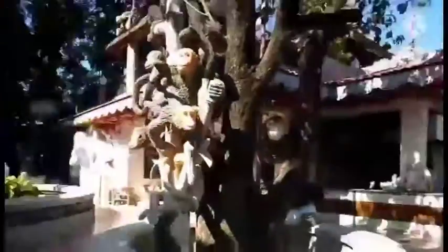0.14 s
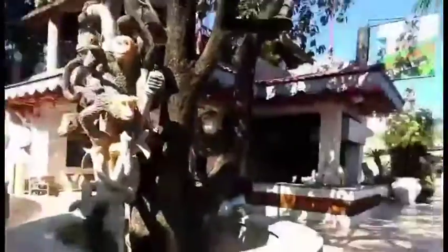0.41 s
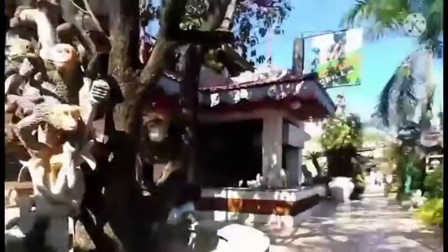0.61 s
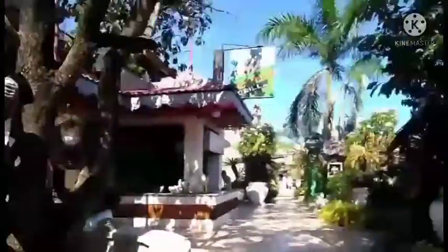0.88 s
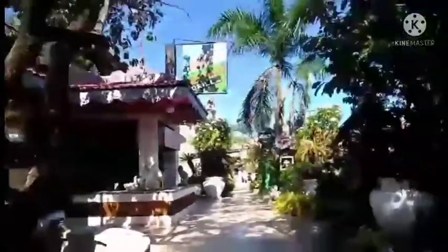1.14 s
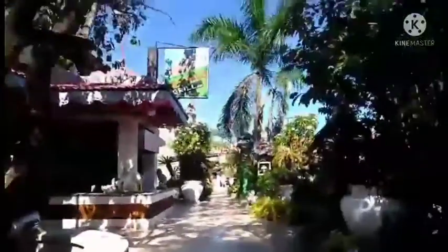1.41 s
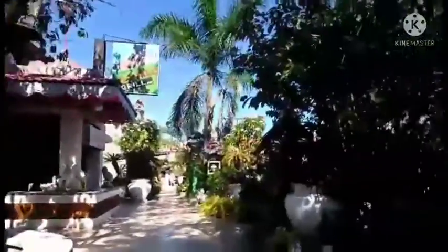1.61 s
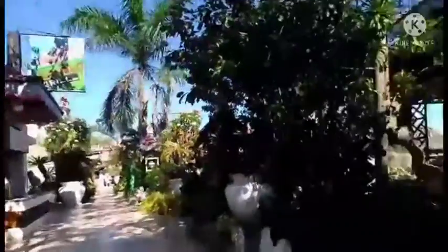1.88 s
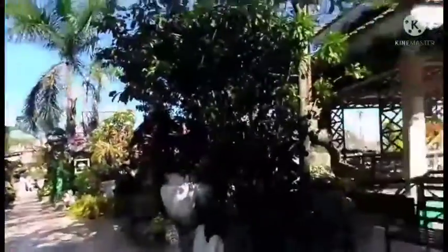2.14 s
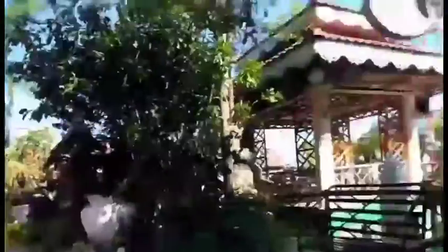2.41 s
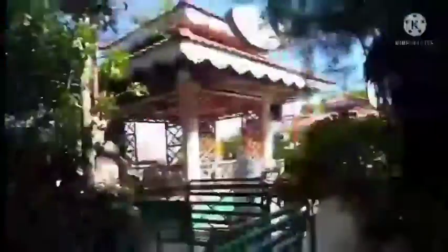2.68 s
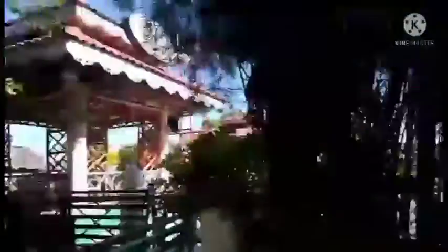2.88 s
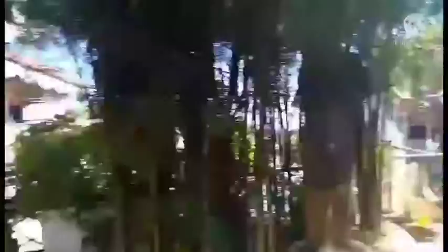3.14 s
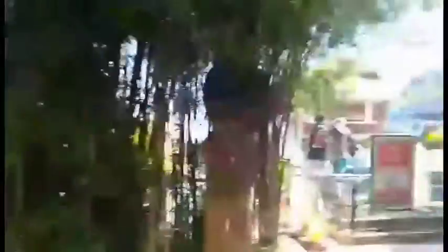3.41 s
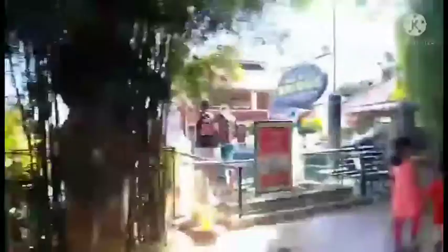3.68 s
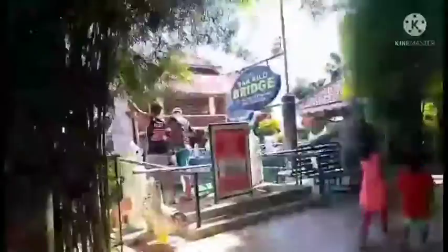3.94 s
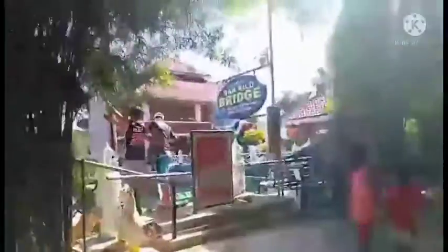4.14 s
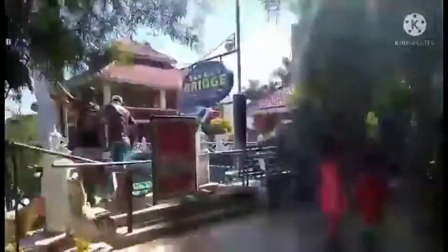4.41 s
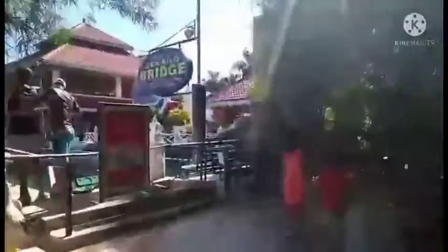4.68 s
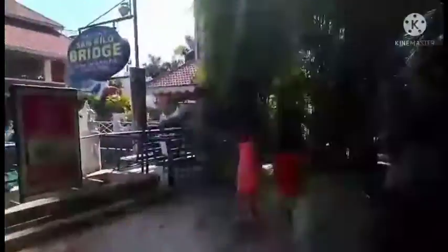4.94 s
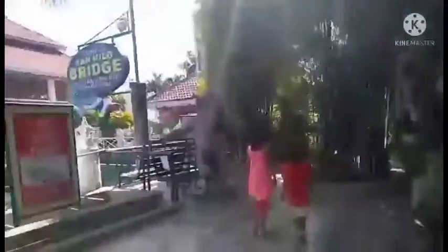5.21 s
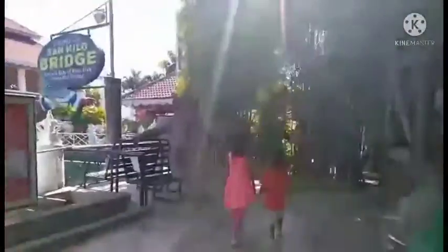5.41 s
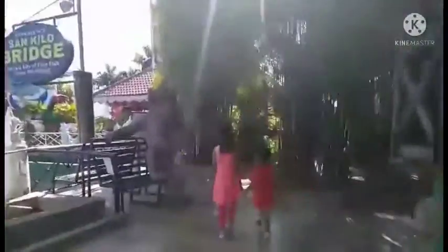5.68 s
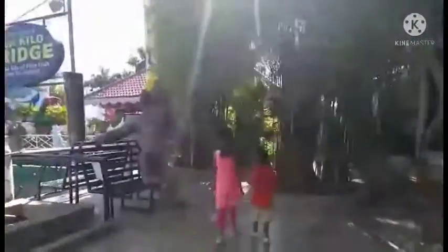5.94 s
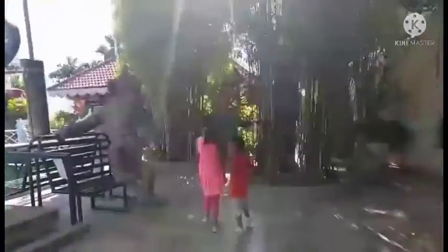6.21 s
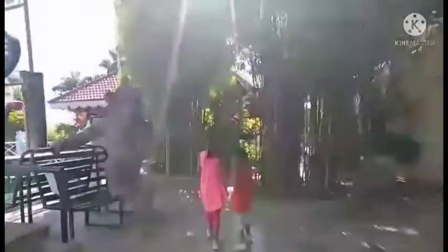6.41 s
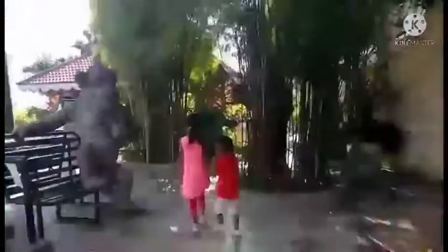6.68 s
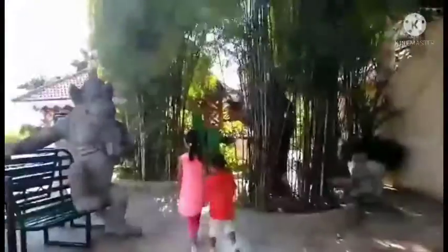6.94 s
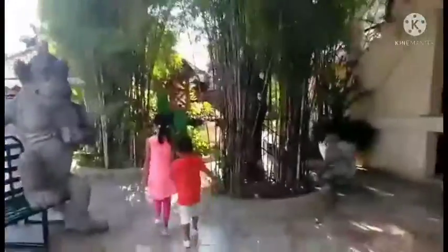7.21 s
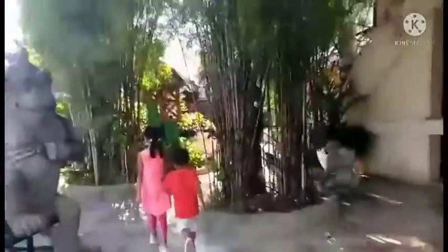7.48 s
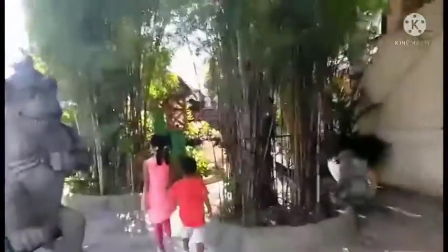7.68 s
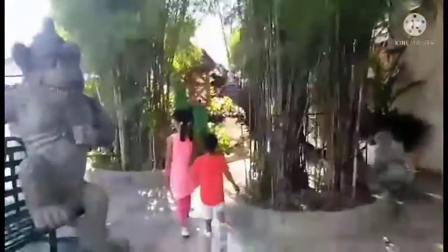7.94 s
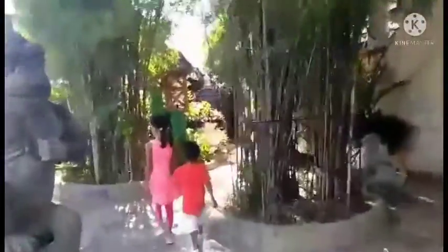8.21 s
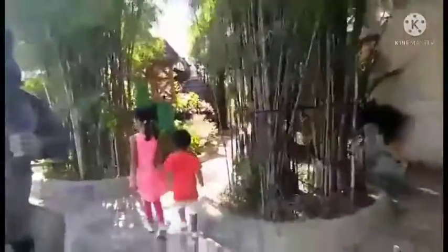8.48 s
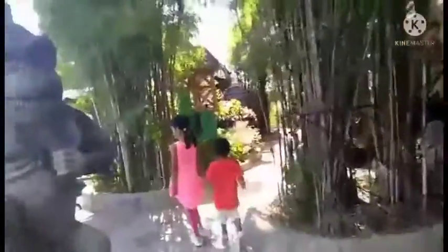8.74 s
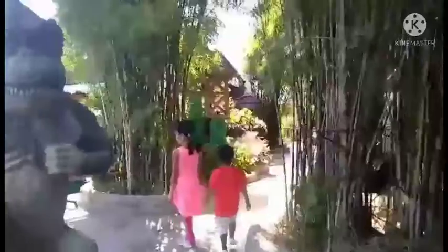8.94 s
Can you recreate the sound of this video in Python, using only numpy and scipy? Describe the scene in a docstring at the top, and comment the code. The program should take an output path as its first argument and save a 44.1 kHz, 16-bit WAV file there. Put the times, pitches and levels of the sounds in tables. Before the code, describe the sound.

A quiet outdoor garden path, heard by two close microphones, the right one brighter. Broad soft rustling of leaves and cloth wavers throughout, slightly fuller after 4 s, above faint distant traffic rumble and low engine hum, with extra engine tones in the later half. Small grit clicks come at 0.4-0.5 s and a bright snap at 0.9 s. From 1.1 to 1.8 s a light shoe scuffs with a rapid patter of soft taps; only faint taps follow until 3.2 s. Grit crackles, then a hard step lands with a rasp at 3.8 s, trailing taps to 4.3 s. A firm knock comes at 4.66 s, and the sharpest gritty snap at 5.03 s breaks into stuttering scrapes. Steps and drags continue from 5.86 to 7 s, then sparse taps at 7.5 and 8.1 s and a crisp scuff at 8.6 s. Rustle remains to about 9 s.

```python
"""Leaves and cloth rustle in a quiet garden over far traffic that rumbles and hums: shaped noise, low tones.
Then grit snaps and light shoes tap on a paved path: clicks and dying contact noise ring short resonances.
From about one second on, soles also drag and scuff: streams of grit clicks ring the sole, hiss and judder.
Two close microphones hear it all, the right one brighter."""
import sys
import numpy as np
from scipy import signal
from scipy.fft import rfft, irfft, next_fast_len
from scipy.io import wavfile

SR = 44100
rng = np.random.default_rng(int(sys.argv[2]) if len(sys.argv) > 2 else 0)


def master_out(mix):
    """Clip the mix to full scale and print it as 16-bit PCM to the path in sys.argv[1]."""
    frames = np.transpose(np.atleast_2d(mix))
    ceiling = np.clip(frames, -1, 1)
    pcm = np.round(ceiling * 32767).astype(np.int16)
    wavfile.write(sys.argv[1], SR, pcm)


def gain_from_decibels(decibels):
    """Convert decibel values to linear amplitude factors."""
    exponent = np.asarray(decibels, float) / 20
    return 10 ** exponent


N = 400869


def curve(rows):
    """Columns of a table, with time in seconds first, read at every sample."""
    s, *columns = np.transpose(rows)
    return [np.interp(np.arange(N) / SR, s, column) for column in columns]


def at_hz(points, hz):
    """A spectrum read on a log-frequency axis."""
    point_hz, values = np.transpose(points)
    return np.interp(np.log(hz), np.log(point_hz), values)


def rms_one(x):
    """Scale to unit power."""
    return x / np.sqrt(np.mean(x ** 2) + 1e-20)


def drift(rate_hz):
    """Slow random wander of unit power: noise through two equal low-pass poles at rate_hz."""
    step = 40   # samples between the points of the wander
    warm_up = 2000
    r = np.exp(-2 * np.pi * rate_hz * step / SR)
    noise = rng.standard_normal(N // step + warm_up + 2)
    slow = signal.lfilter([1], [1, -2 * r, r * r], noise)[warm_up:]
    return np.interp(np.arange(N) / step, np.arange(len(slow)), rms_one(slow))


def band_pass(x, low_hz, high_hz):
    """Butterworth band between two corners."""
    return signal.sosfilt(signal.butter(2, [low_hz, high_hz], "band", fs=SR, output="sos"), x)


def resonance(x, hz, width_hz):
    """Two-pole band-pass with gain 1 on top."""
    r = np.exp(-np.pi * width_hz / SR)
    feedback = [1, -2 * r * np.cos(2 * np.pi * hz / SR), r * r]
    return signal.lfilter([(1 - r * r) / 2, 0, (r * r - 1) / 2], feedback, x + 1e-18)


def double_resonance(x, hz, width_hz):
    """The same resonance twice in a row, for steeper flanks."""
    return resonance(resonance(x, hz, width_hz), hz, width_hz)


def treble(x):
    """The band of fine grit."""
    return band_pass(x, 4200, 11800)


def grains(per_s, spread_db):
    """Random clicks of uneven size and sign."""
    sizes = gain_from_decibels(spread_db * np.minimum(rng.exponential(1, N), 5)) * rng.choice([-1, 1], N)
    return sizes * (rng.random(N) < per_s / SR)


def banded_noise(spectrum, edges, patchy_db, together_db, side_db=0):
    """Stereo noise in bands, each with its own level, flicker, likeness and lean to one side."""
    # Each row: frequency in Hz, correlation of left and right.
    likeness = [(60, 1), (400, 0.87), (1200, 0.022), (3000, 0.011)]
    # Each row: frequency in Hz, factor on the left-right dB of the whole noise.
    lean = [(500, 0), (1500, 0.77), (4000, 0.73), (8000, 1.5), (13000, 5.5)]
    out, together = 0, drift(4.5)
    white = rng.standard_normal((2, 2, N))   # neighbouring bands take turns with two stereo noises
    for k, (low, high) in enumerate(zip(edges, edges[1:])):
        mid, side = band_pass(white[k % 2], low, high)
        hz = np.sqrt(low * high)
        alike = np.clip(at_hz(likeness, hz), -1, 1)
        lean_db = side_db * at_hz(lean, hz) * np.array([[.5], [-.5]])
        waver_db = patchy_db * drift(24) + together_db * together
        gain = gain_from_decibels(at_hz(spectrum, hz) + waver_db + lean_db)
        out = out + gain * (np.sqrt(1 + alike) * mid + np.sqrt(1 - alike) * side * [[1], [-1]])
    return rms_one(out)


def rustle():
    """Leaves and cloth: broad noise that wavers band by band, and a little as a whole."""
    # How the rustle moves. Each row: time in seconds, level in dB, left-right dB before the lean per band.
    air = [(0.0, -46.5, -5.5), (0.33, -49, -3), (0.95, -48.5, -3.5), (1.3, -46, -4.5), (1.8, -47.5, -6.5),
           (1.96, -50.5, -3.5), (2.2, -45.5, -5), (3.1, -47.5, -5), (4.1, -44, -3.5), (4.9, -44, -5),
           (5.44, -43.5, -3), (6.15, -47, -4.5), (6.4, -43, -2.5), (7.1, -43, -4), (7.62, -44.5, -4.5),
           (8.5, -45.5, -4.5), (9.09, -43, -5)]
    # Colour of leaves and cloth. Each row: frequency in Hz, relative density in dB per Hz.
    rustle_colour = [(240, -30), (400, 0), (625, -3.5), (1440, -4), (2380, -0.5), (3410, -2), (10600, -5.5),
                     (12800, -36.5), (13400, -21), (14000, -69)]
    level_db, side_db = curve(air)
    edges_hz = 400 * 2 ** np.arange(0, 5.3, .5)
    noise = banded_noise(rustle_colour, edges_hz, patchy_db=2.2, together_db=.7, side_db=side_db)
    return gain_from_decibels(level_db) * noise


def rumble():
    """Far traffic: low noise in bands, nearly alike on both sides."""
    # Colour of the traffic. Each row: frequency in Hz, relative density in dB per Hz.
    rumble_colour = [(15, -36), (25, -5), (54, 0), (84, -2), (161, -6.5), (216, -12.5), (281, 0),
                     (339, -14), (600, -42), (780, -45), (1320, -120)]
    edges_hz = [36, 50, 70, 100, 140, 190, 270, 400, 600]
    return gain_from_decibels(-53.5) * banded_noise(rumble_colour, edges_hz, patchy_db=2.0, together_db=-0.3)


def engines():
    """Far engines: low tones with an octave above, wavering slightly in pitch and level."""
    # One list per engine. Each row: time in seconds, pitch in Hz, level in dB, octave relative to it in dB.
    engine_paths = [
        [(0, 87.2, -55, -14), (1.2, 86.36, -76, 10), (2.3, 90.4, -55.5, -26), (2.9, 89.05, -59, -11),
         (5.3, 85.9, -62, -11)],
        [(4.9, 47.8, -89, 8), (6.0, 51.14, -57, -17), (7.2, 54.6, -52, -9.5), (9.09, 56.4, -58.5, 2)],
        [(4.2, 148.8, -79, -23), (5.4, 151.2, -59, -22), (6.2, 145, -63.5, -17), (7.2, 148.7, -63, -26)],
        [(5.0, 150, -91, -30), (6.0, 130, -55.5, -24), (7.0, 130, -58.5, -33)],
    ]
    out, t = 0, np.arange(N) / SR
    for rows in engine_paths:
        hz, level_db, octave_db = curve(rows)
        turns = np.cumsum(hz * (1 + 0.01163 * drift(3.04))) / SR
        phase = 2 * np.pi * turns + np.array([[.12], [-.12]])   # left leads right slightly
        heard = (t >= rows[0][0]) & (t <= rows[-1][0])
        tone = np.sin(phase) + gain_from_decibels(octave_db) * np.sin(2 * phase)
        out = out + heard * np.sqrt(2) * gain_from_decibels(level_db + 2.9 * drift(2.7)) * tone
    return out


def snaps():
    """Grit snaps under a sole: a click and a weaker one just behind it, ringing for a cycle or two."""
    # Single grains that snap. Each row: start in seconds, peak in dB, centre of the ring in Hz.
    snap_rows = [(0.426, -31, 5500), (0.482, -30.5, 2500), (0.902, -15.5, 7300), (0.945, -31, 9000),
                 (1.379, -23, 2110), (3.216, -29, 3520), (3.8, -12, 2280), (5.033, -11, 2820),
                 (5.038, -8, 2930), (5.04, -12, 1600), (5.097, -15, 3100), (5.105, -12.5, 2900),
                 (5.863, -19.5, 2250), (5.865, -23, 1100), (6.251, -15, 1970), (6.625, -15.5, 2800),
                 (8.02, -23.5, 4650), (8.613, -20, 3000), (8.623, -20, 3270)]
    width_share = 0.77   # width of each ring stage as a share of its centre
    out = np.zeros(N + SR)
    chance = rng.random((len(snap_rows), 2))
    for (s, peak_db, hz), (lag, size) in zip(snap_rows, chance):
        clicks = np.zeros(SR // 50)
        clicks[0] = 1
        clicks[round((.0006 + .001 * lag) * SR)] = .6 * size
        sound = double_resonance(clicks, hz, width_share * hz)
        i = round(s * SR)
        out[i:i + len(sound)] += gain_from_decibels(peak_db) * sound / np.abs(sound).max()
    return out[:N]


def taps():
    """A blow and a few ms of dying contact noise excite a ring and the sole's modes, with a bright crack."""
    # Soles and pebbles. Each row: start in seconds, peak of the body in dB, centre of the ring in Hz,
    # crack relative to that peak in dB.
    tap_rows = [(0.48, -35.5, 1100, 5), (0.888, -45, 1110, 18), (0.92, -35.5, 1640, -25),
                (1.215, -37.5, 527, -12), (1.278, -32.5, 1960, -22), (1.322, -27, 2500, -12),
                (1.383, -29.5, 1820, -16), (1.419, -31, 2310, -8), (1.436, -35, 1100, -16),
                (1.461, -34, 2250, -16), (1.496, -32, 2400, -16), (1.509, -33, 2300, -16),
                (1.538, -33, 2300, -16), (1.566, -32, 2350, -16), (1.602, -33, 2450, -16),
                (1.635, -34, 2450, -16), (1.695, -35, 2600, -16), (2.013, -38.5, 1600, -16),
                (2.03, -43, 560, 8), (2.27, -33, 2030, -14), (3.282, -33, 890, -16),
                (3.436, -23.5, 1760, -5), (3.817, -11, 1800, -10), (3.98, -24.5, 1216, -18),
                (4.029, -28.5, 2100, -16), (4.078, -30, 1710, -15), (4.102, -25, 1750, 0.5),
                (4.181, -33.5, 2200, -12), (4.196, -33, 2350, -26), (4.239, -22, 2150, -20),
                (4.253, -29, 2200, -20), (4.333, -31, 2300, -16), (4.639, -34, 1075, -7),
                (4.658, -14, 1080, -2.5), (4.661, -24.5, 580, -30), (4.868, -40, 720, -7),
                (5.863, -21.5, 640, 10), (5.873, -25.5, 587, -38), (6.051, -36, 860, -9),
                (6.254, -20, 1100, -24), (6.3, -24.5, 3220, -2), (6.464, -25.5, 1870, -11),
                (6.501, -34, 1996, -9), (6.531, -23, 1938, -21), (6.565, -23, 1910, -36),
                (6.615, -30, 1890, -15), (6.626, -20, 2100, -5), (6.757, -29, 2270, -18),
                (6.841, -33, 1954, -16), (7.002, -31, 1620, -13), (7.47, -42.5, 580, -11),
                (7.57, -30, 1840, -12), (7.578, -39, 895, 6), (8.12, -34, 1380, -4),
                (8.191, -32, 1100, -10), (8.605, -24, 2700, -11), (8.693, -25, 2380, -7)]
    # Modes of sole on stone. Each row: frequency in Hz, relative level in dB before distance and chance,
    # decay setting in seconds (the mode is 3 / decay Hz wide).
    sole_modes = [(396, 2.5, 0.013), (594, 7.5, 0.045), (717, 6, 0.023), (1017, 15, 0.0046),
                  (1386, 1.5, 0.0068), (1586, 5.5, 0.041), (1938, 15, 0.0042), (2350, 12.5, 0.015),
                  (2640, 5, 0.0096), (3270, 9.5, 0.0031)]
    contact_cycles = 12   # contact noise falls 26 dB in this many cycles of the centre
    blow_share = .4       # first blow against the root energy of the contact noise
    ring_width = 0.16     # width of each ring stage as a share of its centre
    modes_db = 5.5        # the modes together, above the ring
    out = np.zeros(N + SR)
    chance = rng.standard_normal((len(tap_rows), len(sole_modes)))
    t = np.arange(SR // 8) / SR
    for (s, peak_db, centre_hz, crack_db), dice in zip(tap_rows, chance):
        contact = rng.standard_normal(len(t)) * np.exp(-3 * t * centre_hz / contact_cycles)
        contact[0] = blow_share * np.sqrt(np.sum(contact ** 2))
        modes = 0
        for (hz, level_db, decay_s), d in zip(sole_modes, dice):
            # modes far from the centre are struck less
            far_db = max(-13 * np.abs(np.log2(hz / centre_hz)), -16)
            # each mode takes only its part of the blow
            struck = resonance(resonance(contact, hz, hz * .5), hz, hz * 0.56)
            mode = rms_one(resonance(struck, hz, 3.0 / decay_s))
            modes = modes + gain_from_decibels(level_db + far_db + 3 * d) * mode
        ring = double_resonance(t == 0, centre_hz, ring_width * centre_hz)
        body = ring / np.abs(ring).max() + gain_from_decibels(modes_db) * modes / np.abs(modes).max()
        crack = treble(contact)
        sound = body / np.abs(body).max() + gain_from_decibels(crack_db) * crack / np.abs(crack).max()
        i = round(s * SR)
        out[i:i + len(t)] += gain_from_decibels(peak_db) * sound
    return out[:N]


def strokes():
    """Gains of drag and grit over time, and the rasp centre weighted by drag power."""
    # Drags of sole and grit. Each row: start in seconds, length in seconds, drag level in dB before swell
    # and fall, fine grit relative to the drag in dB, centre of the rasp in Hz.
    scuff_rows = [(1.083, 0.15, -48.5, -1, 2730), (1.317, 0.5, -44, -7.5, 2470),
                  (1.359, 0.025, -38.5, -15, 1900), (3.207, 0.056, -36.5, -9.5, 2570),
                  (3.228, 0.31, -45.5, 3.5, 3230), (3.46, 0.07, -44, 2, 1500),
                  (3.514, 0.11, -38.5, 0, 2280), (3.606, 0.34, -43.5, -0.5, 2900),
                  (3.782, 0.096, -24, -13, 1820), (3.884, 0.031, -31, -8, 1700),
                  (3.947, 0.048, -37, -4, 2500), (4.185, 0.029, -41, -3, 2350),
                  (4.269, 0.27, -39.5, -6.5, 2350), (5.024, 0.011, -25, -7, 2250),
                  (5.028, 0.015, -19.5, -2.5, 2500), (5.05, 0.04, -30.5, -1.5, 2500),
                  (5.093, 0.014, -29, -12, 2600), (5.116, 0.026, -31.5, -2, 2180),
                  (5.161, 0.012, -30.5, -1.5, 2350), (5.189, 0.019, -30.5, -2.5, 2220),
                  (5.214, 0.035, -29, -2.5, 2350), (5.285, 0.13, -35.5, 0.5, 2350),
                  (5.375, 0.4, -42, 0.5, 2090), (5.827, 0.018, -39, -12, 1100),
                  (6.249, 0.0082, -25, 1.5, 2340), (6.29, 0.048, -33, -2.5, 4000),
                  (6.366, 0.053, -30, 0, 2170), (6.415, 0.25, -37, -2, 2100),
                  (6.709, 0.19, -40, -7.5, 2100), (6.95, 0.094, -45, -18, 2200),
                  (7.268, 0.14, -60.5, 19.5, 2450), (7.551, 0.015, -48, -17, 1100),
                  (8.598, 0.03, -26, -12, 2580), (8.634, 0.018, -39, 2, 800),
                  (8.703, 0.01, -31, -4.5, 1490)]
    rise_s, rise_share = 0.0039, 0.16     # a drag swells in this time plus this share of its length,
    sag_db, lift_db_per_s = 5.5, 522      # sags over its length and dies when the sole lifts
    t = np.arange(N) / SR
    drag, grit, pitch = np.full((3, N), 1e-12)
    for s, length, drag_db, grit_db, hz in scuff_rows:
        swell = np.clip((t - s) / (rise_s + rise_share * length), 0, 1)
        sag = sag_db * np.clip((t - s) / length, 0, 1)
        lift = lift_db_per_s * np.maximum(t - s - length, 0)
        power = (swell * gain_from_decibels(drag_db - (sag + lift))) ** 2
        drag = drag + power
        grit = grit + power * gain_from_decibels(2 * grit_db)
        pitch = pitch + power * np.log(hz)
    return np.sqrt(drag), np.sqrt(grit), np.exp(pitch / drag)


def scuffs():
    """Grit clicks ring the sole near each drag's centre: light drags crackle in clumps, hard ones
    stick and slip about a hundred times a second. Each side also hears grit of its own."""
    # Drag of rubber on stone. Each row: frequency in Hz, width of each filter stage in Hz, relative level
    # in dB at the rasp centre.
    drag_bands = [(560, 300, 5.5), (1100, 560, -0.5), (1815, 460, -0.5), (2100, 780, -2.5), (2500, 1180, 0),
                  (3000, 1250, 0.5), (4100, 7000, 4)]
    drag_gain, grit_gain, centre_hz = strokes()
    hard = np.clip(drag_gain / gain_from_decibels(-30), 0, 1)
    # sticking and slipping, at a wandering rate in Hz
    phase = np.cumsum(105.9 * gain_from_decibels(2.8 * drift(28.4)) / SR) % 1
    judder = .45 + 1.6 * np.sin(np.pi * phase ** .6) ** 2
    # each clump starts at once and fades with a time constant of 3 ms
    clump_fade = np.exp(-1 / (.003 * SR))
    clumps = .9 + rms_one(signal.lfilter([1], [1, -clump_fade], np.abs(grains(100, 1.5))))
    crackle = rms_one(grains(1000, 2.7) * clumps)
    rubbing = rms_one(grains(7000, 1.0))
    own = rms_one(np.array([grains(3000, 0.39) for side in "LR"]))
    light_clicks = (1 - hard) * (.9 * crackle + .2 * rubbing)
    hard_clicks = hard * judder * rubbing
    clicks = light_clicks + hard_clicks + .6 * own * rms_one(clumps)
    drag, power = 0, 0
    for k, (hz, width_hz, level_db) in enumerate(drag_bands):
        # bands away from the rasp centre are weaker, less so in a hard drag
        far_db = (19 - 7.4 * hard) * np.abs(np.log2(hz / centre_hz))
        share = gain_from_decibels(level_db - far_db)
        band = double_resonance(clicks, hz, width_hz)
        drag = drag + (-1) ** k * share * rms_one(band)
        power = power + share ** 2
    grit = treble(0.33 * crackle + 0.051 * rubbing + own * clumps ** 0.57)
    return drag_gain * drag / np.sqrt(power) + grit_gain * rms_one(grit)


def two_ports(x):
    """Left hears steps duller, right brighter and slightly later; ground, walls and trunks echo."""
    # Difference between the microphones. Each row: frequency in Hz, left-right dB.
    tilt = [(300, 3), (1000, 0.5), (3000, -1), (5000, 1), (8000, -4), (13000, -11)]
    # Dulled echoes of the steps. Each row: delay left in seconds, delay right in seconds, level in dB.
    echo_rows = [(0.01, .014, -11), (0.024, 0.021, -18.5), (0.043, 0.047, -21.5)]
    size = next_fast_len(N + SR)
    hz = np.maximum(np.fft.rfftfreq(size, 1 / SR), 1)
    half = gain_from_decibels(at_hz(tilt, hz) / 2)
    turn = -2j * np.pi * hz   # times a delay in seconds
    dull = 1 / (1 + 1j * hz / 8000)
    left_echoes = dull * sum(gain_from_decibels(db) * np.exp(turn * left_s) for left_s, right_s, db in echo_rows)
    right_echoes = dull * sum(gain_from_decibels(db) * np.exp(turn * right_s) for left_s, right_s, db in echo_rows)
    left = half * (1 + left_echoes)
    right = (np.exp(turn * .00005) + right_echoes) / half
    return irfft(rfft(x, size) * np.array([left, right]), size)[:, :N]


def scene():
    """Steps over rustle, rumble and far engines."""
    # Where the steps are heard. Each row: time in seconds, left-right dB on top of the microphones' own.
    step_side = [(0.4, -7), (1.3, 0), (3.7, -3.5), (4.7, -1), (9.0, -2.5)]
    background = rustle() + rumble() + engines()
    side_db, = curve(step_side)
    steps = two_ports(snaps() + taps() + scuffs()) * gain_from_decibels(side_db * np.array([[.5], [-.5]]))
    return steps + background


def top_cut(x):
    """Nothing passes above the cut-off."""
    return signal.sosfilt(signal.butter(12, 14260, fs=SR, output="sos"), x)


def record(dry):
    """Both ends of the range are cut steeply."""
    low_cut = signal.butter(4, 38, "high", fs=SR, output="sos")
    high_cut = signal.cheby2(14, 45, 13440, fs=SR, output="sos")   # 45 dB down from 13440 Hz on
    mix = signal.sosfilt(high_cut, signal.sosfilt(low_cut, dry))
    return top_cut(mix)


dry = scene()
out = record(dry)
master_out(out)
```